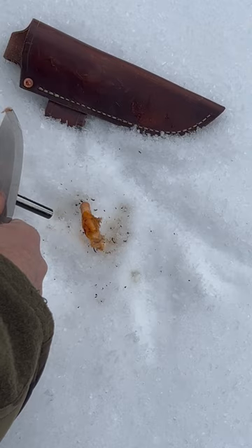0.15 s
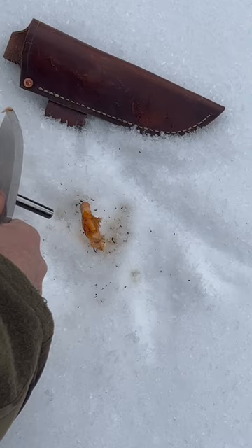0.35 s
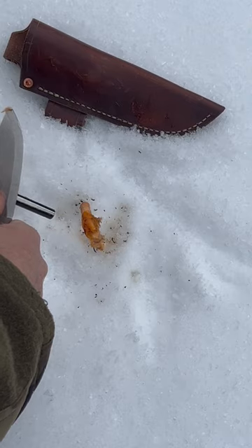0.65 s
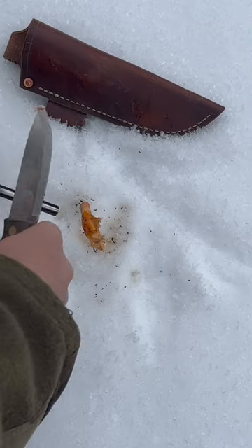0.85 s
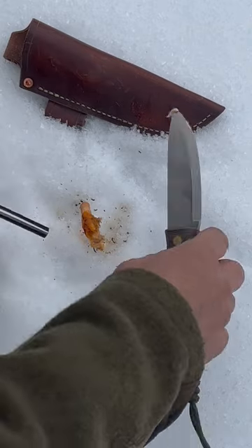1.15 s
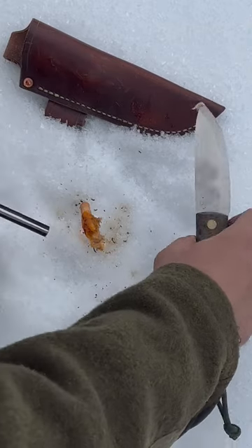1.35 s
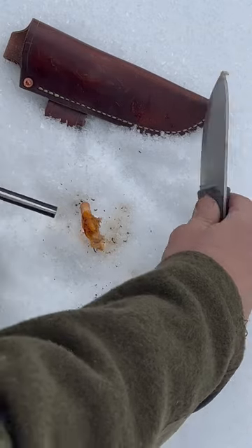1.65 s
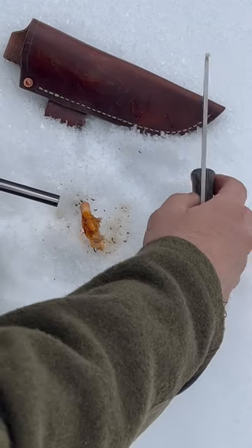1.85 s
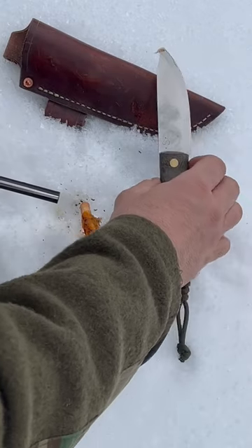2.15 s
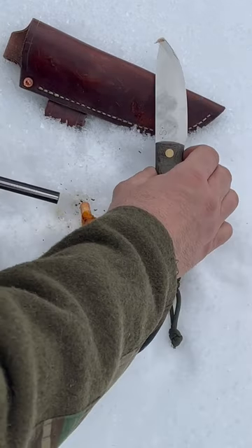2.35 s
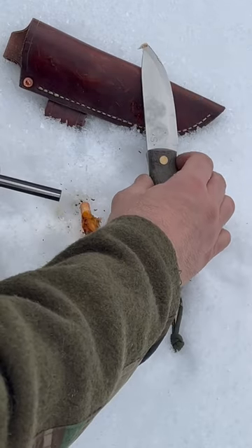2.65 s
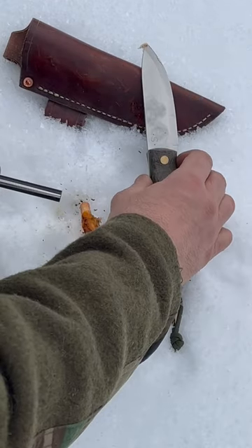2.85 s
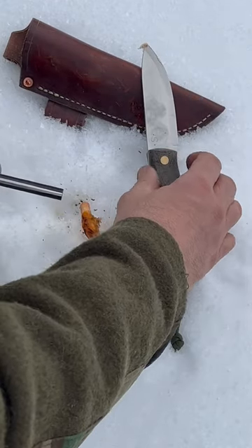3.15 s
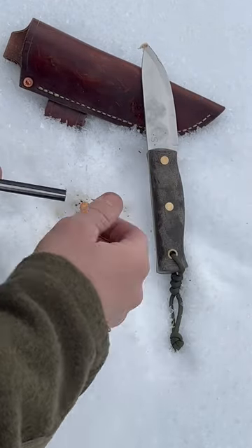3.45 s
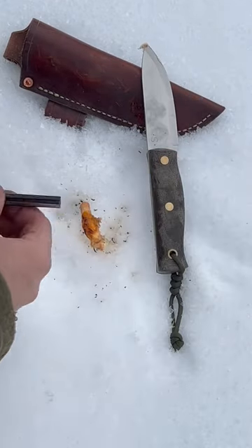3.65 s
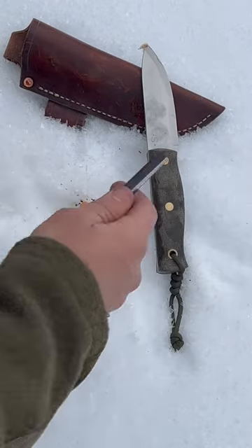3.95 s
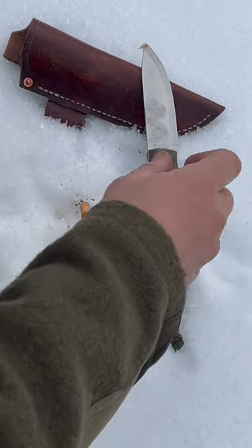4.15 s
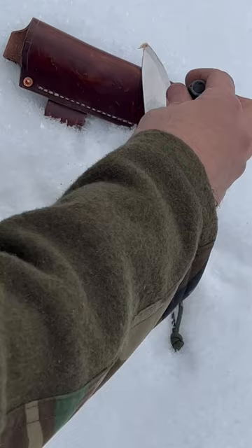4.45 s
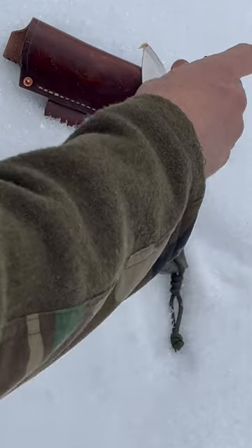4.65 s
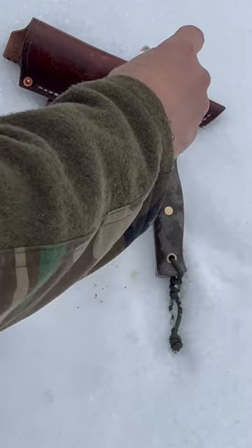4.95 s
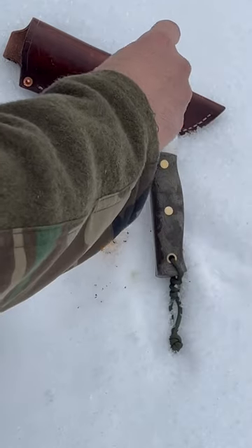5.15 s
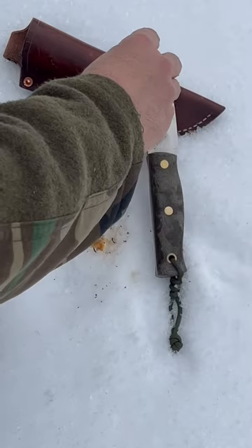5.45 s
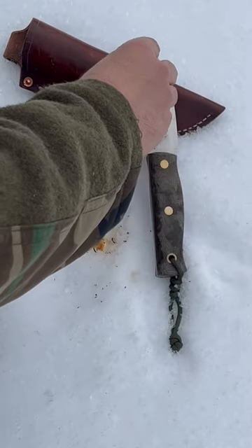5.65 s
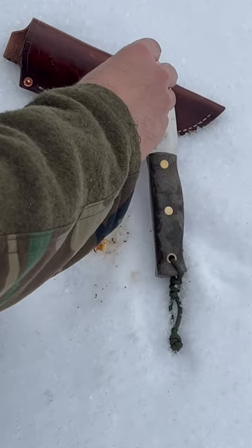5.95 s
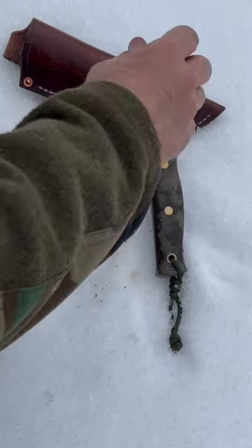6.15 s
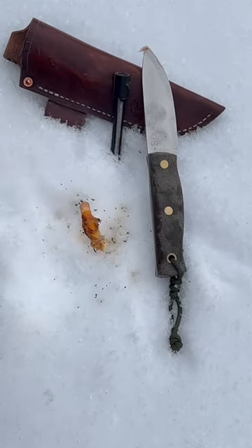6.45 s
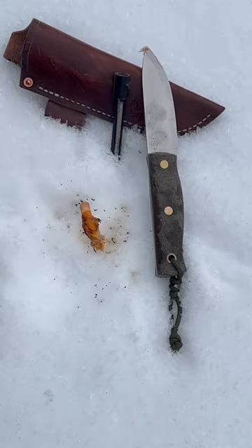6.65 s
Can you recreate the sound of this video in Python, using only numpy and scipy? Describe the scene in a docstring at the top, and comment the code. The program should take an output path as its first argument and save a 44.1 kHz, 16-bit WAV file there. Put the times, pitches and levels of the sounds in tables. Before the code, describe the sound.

Close outdoor handling on crusty snow: soft cloth rubbing, crisp ice ticks, one dull knife knock, low windy thumps and a bright metallic clack.

```python
"""Close handling over crusty snow. A wool sleeve rustles past the microphone while icy grains tick and crunch.
A knife knocks dully on its leather sheath and slides a little; then the rustle grows, soft thumps come
and a fire-starting rod clacks against the blade and bounces. Rustle and crunch then go on to the end.
Rubbing is many tiny bursts of noise, with only a short moving echo off the snow; knocks are ringing modes
and grains short ringing clicks. Gusts of wind, made of shaped noise, buffet the ports over a quiet hush."""
import sys
import numpy as np
from scipy import signal
from scipy.fft import rfft, irfft
from scipy.io import wavfile
from scipy.ndimage import uniform_filter1d

SR = 44100
rng = np.random.default_rng(int(sys.argv[2]) if len(sys.argv) > 2 else 0)


def output_pcm(signal):
    """Save a mono or channel-first signal as 16-bit PCM at the path in sys.argv[1].

    Samples are clipped to [-1, 1] before scaling.
    """
    pcm = np.clip(np.atleast_2d(signal).T, -1, 1) * 32767
    wavfile.write(sys.argv[1], SR, np.round(pcm).astype(np.int16))


N = 299880
TIME = np.arange(N) / SR
FREQS = np.fft.rfftfreq(N, 1 / SR)
# turns one signal into an equal left and right pair with opposite signs
OPPOSITE = np.array([[1], [-1]])
# tone colour of snapping ice grains: (frequency [Hz], relative level [dB])
GRAIN_COLOUR = [(150, -18), (700, -8), (1300, -4), (2400, -1.5), (3000, -4.5), (3700, -1), (5900, 3),
                (6900, 1), (7700, 4.5), (11400, 2.5), (13000, -3.5), (16000, -10)]


def from_db(db):
    """Turn decibels into a gain."""
    return 10 ** (np.asarray(db) / 20)


def rms_one(x):
    """Scale a signal so that its rms (average strength) is 1."""
    return x / np.sqrt(np.mean(x ** 2) + 1e-20)


def in_time(rows):
    """Draw straight lines between the rows of a table: one curve over time per column."""
    times, *columns = np.transpose(rows)
    return [np.interp(TIME, times, column) for column in columns]


def coloured(x, spectrum):
    """Make some frequencies louder than others, then scale to rms 1."""
    hz, db = np.transpose(spectrum)
    size = x.shape[-1]
    log_freqs = np.log(np.fft.rfftfreq(size, 1 / SR) + 1)
    gain = from_db(np.interp(log_freqs, np.log(hz), db))
    return rms_one(irfft(rfft(x) * gain, size))


def drift(rate_hz):
    """Wander smoothly at random, with rms 1: noise with its fast changes removed."""
    spectrum = rfft(rng.standard_normal(N))
    return rms_one(irfft(spectrum / (1 + (FREQS / rate_hz) ** 2), N))


def ring(x, hz, t60):
    """Ring like a struck mode: each unit click starts a sine that falls by 60 dB in t60 seconds."""
    radius = from_db(-60 / (t60 * SR))
    angle = 2 * np.pi * hz / SR
    feedback = [1, -2 * radius * np.cos(angle), radius * radius]
    return signal.lfilter([0, np.sin(angle)], feedback, x + 1e-18)


def stereo_noise(side_db):
    """White noise for two close ports: a shared part plus a weaker part of opposite sign."""
    mid, side = rng.standard_normal((2, N))
    return mid + from_db(side_db) * side * OPPOSITE


def add(out, start_s, sound):
    """Mix a short sound in at a given time."""
    at = round(start_s * SR)
    out[..., at:at + sound.shape[-1]] += sound[..., :N - at]


def swells(rows, rise_db, fall_db_per_s):
    """Gain of separate swells: each builds up by rise_db over one length, holds for one and dies away."""
    power = 0
    for start_s, length_s, db in rows:
        below_before = rise_db * (start_s - TIME) / length_s
        below_after = fall_db_per_s * (TIME - start_s - length_s)
        below = np.clip(np.maximum(below_before, below_after), 0, 100)
        power = power + from_db(db - below) ** 2
    return np.sqrt(power)


def sleeve(ring_hz=5750, ring_s=0.0014):
    """Wool rubs dully and its folds flap; crust and stiff fibres crackle above it, at first with a thin ring."""
    # how hard the arm moves: (time [s], rubbing level before offset [dB], crackle level before offset [dB])
    movement = [(0.0, -86.5, -83), (0.58, -77.5, -82.5), (0.76, -76.5, -76), (1.06, -76.5, -83),
                (1.48, -74.5, -77), (1.89, -84, -90.5), (2.54, -79.5, -90), (2.76, -91.5, -99),
                (2.99, -78, -99), (3.16, -74, -81.5), (3.56, -67.5, -66), (3.79, -68.5, -77),
                (4.0, -67, -86), (4.3, -69.5, -86.5), (4.71, -61.5, -93), (5.08, -69, -72.5),
                (5.61, -66, -75), (5.87, -74.5, -74), (6.14, -73.5, -83.5), (6.34, -73, -92),
                (6.48, -77.5, -70.5), (6.8, -72, -91)]
    # quick brushes of the sleeve: (time [s], length [s], level [dB])
    brush_times = [(0.0, 0.024, -69.5), (0.22, 0.14, -73), (0.46, 0.021, -64.5), (1.19, .05, -70.5),
                   (1.52, .04, -70.5), (1.89, 0.021, -71), (2.675, 0.02, -69.5), (2.98, 0.026, -72),
                   (3.08, 0.07, -72), (3.37, 0.065, -58.5), (3.5, 0.059, -54), (4.5, 0.082, -62),
                   (4.95, 0.11, -60.5), (5.33, 0.015, -57.5), (5.6, 0.12, -60.5), (6.38, 0.18, -68.5)]
    # heavy folds of the sleeve bend: (time [s], length [s], level [dB])
    fold_times = [(3.08, 0.074, -66), (4.7, 0.14, -70), (5.36, 0.23, -68.5), (6.72, .08, -66.5)]
    # tone colour of rubbing wool: (frequency [Hz], relative level [dB])
    cloth_colour = [(120, 3), (300, 6), (520, -3), (750, 0), (1250, 3), (1700, 1), (2400, 5), (3150, -2.5),
                    (3900, -4), (4700, -2.5), (5900, -1.5), (9000, -5.5), (16000, -29)]
    # tone colour of crust and stiff fibres: (frequency [Hz], relative level [dB])
    crackle_colour = [(700, -25), (2200, -12.5), (3100, -7.5), (3800, 1.5), (4500, -10.5), (5800, 3.5),
                      (6800, -1), (7500, 5), (9300, 1.5), (11300, 0), (12800, -4.5), (14200, -1),
                      (15600, 2), (16400, -62)]
    # thin ring while the tools are held together: (time [s], level against the crackle before offset [dB])
    ringing = [(0, 5), (.85, 4.5), (1.25, -29)]

    # loudness of each part over time; a brush adds to both rubbing and crackling
    rub_db, crackle_db = in_time(movement)
    brush = swells(brush_times, rise_db=28.5, fall_db_per_s=317)
    rubbing = np.hypot(from_db(rub_db + 3.5), from_db(-3) * brush)
    crackling = np.hypot(from_db(crackle_db + 7.5), brush)
    # small folds flap along with all rubbing
    heavy_folds = swells(fold_times, rise_db=45, fall_db_per_s=202)
    bending = np.hypot(from_db(-6.5) * rubbing, heavy_folds)

    rub = friction(cloth_colour, per_s=970, spread_db=5.5, grain_s=0.00082,
                   hiss_db=-11.5, clump_db=2.5, side_db=-32)
    crackle = friction(crackle_colour, per_s=480, spread_db=5.6, grain_s=0.00028,
                       hiss_db=-13, clump_db=2.0, side_db=-12)
    thin_ring = rms_one(ring(crackle, ring_hz, ring_s))
    crackle = crackle + from_db(in_time(ringing)[0] - 8.0) * thin_ring
    flapping = from_db(3.2 * drift(25)) * stereo_noise(side_db=-11)
    folds = coloured(flapping, [(60, 1.5), (140, 5.5), (420, 2.0), (750, -9), (1500, -20.5)])
    # lesser ticks follow the loudness of the rustle
    strays = from_db(-9.5) * np.hypot(rubbing, crackling) * stray_grains()
    return snow_reflection(rubbing * rub + crackling * crackle + strays) + bending * folds


def friction(spectrum, per_s, spread_db, grain_s, hiss_db, clump_db, side_db):
    """Fibres and crystals catch and let go: tiny bursts of uneven size, in clumps, over a smooth hiss."""
    sizes = from_db(spread_db * np.minimum(rng.exponential(1, N), 3.5))
    slips = sizes * (rng.random(N) < per_s / SR)
    # each slip dies away over a few grain times
    power = signal.lfilter([1], [1, -np.exp(-1 / (grain_s * SR))], slips ** 2 + 1e-18)
    bursts = rms_one(np.sqrt(power))
    strength = (bursts + from_db(hiss_db)) * from_db(clump_db * drift(47))
    # a steady hand spends about the same effort in every tenth of a second
    strength = strength / np.sqrt(uniform_filter1d(strength ** 2, size=SR // 10))
    return coloured(strength * stereo_noise(side_db), spectrum)


def stray_grains(per_s=30, spread_db=3):
    """Single crystals snap at random, each a short fading burst of noise; rms 1."""
    sizes = from_db(spread_db * rng.uniform(-1.7, 1.7, N))
    snaps = (rng.random(N) < per_s / SR) * sizes
    crumbling = signal.lfilter([1], [1, -np.exp(-1 / (0.00092 * SR))], snaps + 1e-18)
    return coloured(crumbling * stereo_noise(side_db=-14.5), GRAIN_COLOUR)


def snow_reflection(x):
    """The rustle reflects off the snow: a short moving echo sweeps notches through it."""
    # path of the echo: (time [s], delay [ms], level [dB])
    echo_path = [(0, .5, -14), (.95, .5, -13), (1.2, .6, -26), (3.6, .65, -20), (4.03, .5, -6),
                 (4.33, .59, -5), (4.55, .66, -17), (6.8, .83, -20)]
    delay_ms, echo_db = in_time(echo_path)
    late = TIME - delay_ms / 1000
    echo = np.array([np.interp(late, TIME, channel) for channel in x])
    return x + from_db(echo_db) * echo


def ticks(ring_cycles=15.0, ring_db=-21, side_db=-10, level_db=-23, lead_s=0.0012, top_ratio=2.74):
    """A grain snaps, rings a few cycles and crumbles; small grains ring higher and sound brighter."""
    # sharp ticks of icy grains: (time [s], level before level_db is added [dB], ring frequency [Hz])
    grains = [(0.2506, -39.5, 6000), (0.323, -32, 6250), (0.331, -37, 5560), (0.476, -37.5, 5830),
              (0.5968, -29.5, 6400), (0.6459, -36, 5850), (0.828, -38.5, 8700), (0.8812, -44, 1900),
              (1.1631, -39, 6050), (1.215, -36.5, 8400), (1.5254, -33.5, 7400), (1.5501, -35, 8600),
              (1.6075, -36.5, 3830), (1.684, -31, 4630), (1.7533, -43, 5670), (2.1855, -49.5, 4570),
              (2.31, -33.5, 8000), (2.3584, -27.5, 8000), (2.479, -42.5, 3020), (2.672, -50, 8400),
              (2.979, -36.5, 7800), (3.007, -34.5, 8100), (3.072, -39, 5010), (3.1, -34.5, 4700),
              (3.137, -33, 7600), (3.16, -40, 1470), (3.1786, -37.5, 7800), (3.3826, -33.5, 1640),
              (3.433, -34, 2730), (3.5111, -30.5, 7700), (3.5307, -30, 7660), (3.581, -34.5, 6030),
              (3.6, -28.5, 7640), (3.76, -33.5, 7340), (4.2372, -39.5, 2490), (4.402, -36, 2410),
              (4.584, -36.5, 2970), (4.9003, -34.5, 1450), (4.9106, -39.5, 1100), (5.071, -35, 8940),
              (5.1657, -30.5, 3020), (5.246, -35, 9100), (5.398, -31.5, 5850), (5.403, -28, 7500),
              (5.873, -22.5, 7800), (5.8775, -31.5, 7740), (5.8948, -27, 7700), (6.326, -38.5, 7300),
              (6.4315, -35, 6500), (6.523, -33, 6300), (6.7204, -26, 7900)]
    out = np.zeros((2, N))
    t = TIME[:SR // 60]
    crumble = 0.1 * np.exp(-t / 0.0006) + 0.022 * np.exp(-t / 0.004)
    for start_s, db, hz in grains:
        mid, side = rng.standard_normal((2, len(t)))
        noise = mid + from_db(side_db) * side * OPPOSITE
        snap = (t == 0) + crumble * noise
        tick = snap + from_db(ring_db) * ring(snap, hz, ring_cycles / hz)
        # a little silence leaves room for the soft start that the colouring gives
        tick = np.pad(tick, [(0, 0), (round(lead_s * SR), 0)])
        top_hz = np.clip(top_ratio * hz, 0.15 * SR, 0.45 * SR)
        softened = signal.lfilter(*signal.butter(1, top_hz, fs=SR), tick)
        # the treble arrives first and the low part trails a little
        smeared = signal.lfilter([-0.75, 1], [1, -0.75], softened)
        add(out, start_s, from_db(db + level_db) * coloured(smeared, GRAIN_COLOUR))
    return out


def body(force, modes):
    """The modes of an object answer a force; the lowest bass is taken out."""
    rings = sum(from_db(db) * ring(force, hz, t60) for hz, db, t60 in modes)
    high_pass = signal.butter(2, 260, "high", fs=SR, output="sos")
    return signal.sosfilt(high_pass, rings)


def knock(hits, modes, grit_db, grit_s):
    """A blow and its bounces, each with a short gritty contact that drives mostly the high modes."""
    force = np.zeros(N)
    t = TIME[:SR // 30]
    for start_s, db in hits:
        # differences between noise samples hold mostly treble
        rough = np.diff(rng.standard_normal(len(t) + 1))
        grit = from_db(grit_db) * np.exp(-t / grit_s) * rough
        add(force, start_s, from_db(db) * ((t == 0) + grit))
    return body(force, modes)


def knife(slide_db=-1, hiss_db=-4):
    """It lands with a dull knock, then slides a little: rough drag rings the same modes under a hiss."""
    # the knife meets the sheath: (time [s], strength of the blow [dB])
    landings = [(2.2464, -42.5), (2.2477, -44), (2.2512, -57), (2.2575, -47.5)]
    # knife on leather: (frequency [Hz], relative level [dB], time to fall 60 dB [s])
    knife_modes = [(330, -38, 0.02), (484, -2, 0.027), (684, -3.5, 0.052), (850, -2, 0.014),
                   (980, 0, 0.012), (1506, 1.5, 0.016), (1610, -11.5, 0.02), (2290, -21, 0.038),
                   (3020, -5, 0.0094), (3480, -16, 0.01), (4790, -21, 0.036)]
    # the knife slides to rest: (time [s], level before slide_db is added [dB])
    slide_curve = [(2.484, -100), (2.489, -58.5), (2.5, -70.5), (2.54, -67), (2.562, -76), (2.59, -100)]
    landing = knock(landings, knife_modes, grit_db=-19, grit_s=0.003)
    drag = np.diff(rng.standard_normal(N + 1))
    hiss = coloured(stereo_noise(side_db=-44), [(300, 13), (3500, 1), (8000, 2), (12000, -27)])
    slide = rms_one(body(drag, knife_modes)) + from_db(hiss_db) * hiss
    return landing + from_db(in_time(slide_curve)[0] + slide_db) * slide


def rod(lag_s=0.00002):
    """Metal modes give a bright clack, a little to the right, so the left port hears it later."""
    # the rod clacks against the blade and bounces: (time [s], strength of the blow [dB])
    clacks = [(4.7801, -30.5), (4.7827, -44), (4.7925, -36.5)]
    # rod on blade: (frequency [Hz], relative level [dB], time to fall 60 dB [s])
    rod_modes = [(330, -21, 0.069), (453, -13.5, 0.086), (1044, -12, 0.015), (1820, -11, 0.042),
                 (2260, -25, 0.0076), (2784, 1.5, 0.032), (3020, -2.5, 0.025), (3240, -18, 0.018),
                 (3740, -6.5, 0.0058), (4800, -6.5, 0.012), (5630, -15, 0.04)]
    clack = knock(clacks, rod_modes, grit_db=-19, grit_s=0.002)
    left = np.interp(TIME - lag_s, TIME, clack)
    return np.array([left, clack])


def thumps(skew=0.18):
    """A soft push is a low sine that swells and dies, slightly out of step at the two ports."""
    # soft thumps of hand, sleeve and air: (time [s], height of the swell [dB], pitch [Hz], length [s])
    pushes = [(2.365, -47.5, 148, 0.0062), (3.538, -35, 65.7, 0.0076), (3.932, -32, 82.6, 0.067),
              (3.94, -37.5, 145, 0.017), (4.031, -29.5, 70.4, 0.043), (4.209, -22, 66.4, 0.019),
              (4.237, -30.5, 109, 0.012), (4.298, -30, 91, 0.028), (5.882, -45, 330, 0.0059),
              (5.888, -44.5, 178, 0.016), (6.7254, -51.5, 630, 0.005)]
    out = np.zeros((2, N))
    t = TIME[:SR // 6]
    for start_s, db, hz, length_s in pushes:
        # the swell is highest after a third of the length
        age = 3 * t / length_s
        swell = (age * np.exp(1 - age)) ** 2
        # radians; which port leads is left to chance
        offset = skew * rng.choice([-1, 1]) * OPPOSITE
        add(out, start_s, from_db(db) * swell * np.sin(2 * np.pi * hz * t + offset))
    return out


def wind(breeze_db=-70.5, hush_db=-76.5):
    """Gusts of low noise buffet the microphone ports over a faint steady breeze and a quiet hush."""
    # gusts of wind buffet the ports: (time [s], length [s], level [dB])
    gust_times = [(0.1, 0.053, -59.5), (0.43, .14, -65.5), (0.81, 0.062, -59.5), (1.13, 0.029, -64.5),
                  (1.56, 0.14, -68), (2.75, .15, -52.5), (2.99, 0.16, -60.5), (3.56, 0.52, -45.5),
                  (4.2, .22, -41), (4.52, 0.11, -60.5), (4.79, 0.099, -61), (6.36, 0.25, -59.5),
                  (6.7, 0.12, -59.5)]
    # tone colour of the buffeting: (frequency [Hz], relative level [dB])
    rumble_colour = [(15, -14), (28, -13.5), (45, 3), (75, 3), (110, -8), (170, -19.5), (260, -40),
                     (500, -43.5), (1500, -63)]
    # tone colour of the hush: (frequency [Hz], relative level [dB])
    hush_colour = [(30, -5), (120, 13), (300, 5.5), (1100, -4.5), (2300, -12.5), (3200, -6.5), (6000, -19),
                   (16000, -22)]
    rumble = coloured(stereo_noise(side_db=-14), rumble_colour)
    # hold the rumble's average power steady, so that the gusts set its loudness
    power = uniform_filter1d(np.mean(rumble ** 2, axis=0), size=SR // 16)
    evened = rumble / np.sqrt(power)
    hush = from_db(hush_db) * coloured(stereo_noise(side_db=-7.5), hush_colour)
    gusts = swells(gust_times, rise_db=47.5, fall_db_per_s=336)
    flow = np.hypot(from_db(breeze_db), gusts)
    return flow * evened + hush


def scene(knife_left_db=0.8):
    """The handling happens within arm's length, in wind; the knife is slightly louder on the left."""
    placed_knife = knife() * from_db(knife_left_db * OPPOSITE)
    return sleeve() + ticks() + placed_knife + rod() + thumps() + wind()


def record(dry, cutoff_hz=16600):
    """The microphone pair leans left in the low mids and shifts in phase in the treble; the top is cut."""
    # phase between the two ports: (frequency [Hz], lead of the left port [radians])
    port_phase = [(8500, 0), (9400, -1.9), (10200, -3.14), (11650, -6.1), (12400, -6.5), (13750, -9.42),
                  (15300, -12.5)]
    left, right = rfft(dry)
    lean = from_db(np.interp(FREQS, [0, 800, 1600], [0.3, 1.0, 0]))
    turn = np.exp(-1j * np.interp(FREQS, *np.transpose(port_phase)))
    # the high power makes the cut very steep
    low_pass = 1 / np.sqrt(1 + (FREQS / cutoff_hz) ** 200)
    return irfft(np.array([left * lean, right / lean * turn]) * low_pass, N)


dry = scene()
out = record(dry)
output_pcm(out)
```